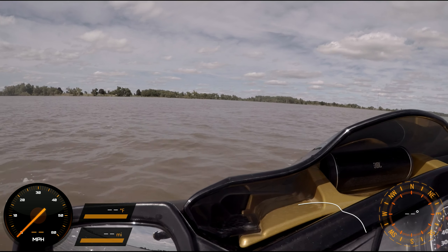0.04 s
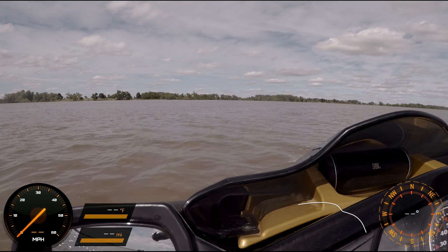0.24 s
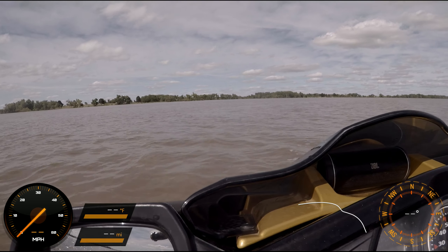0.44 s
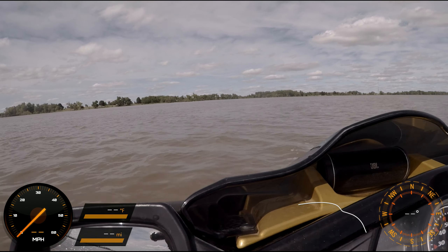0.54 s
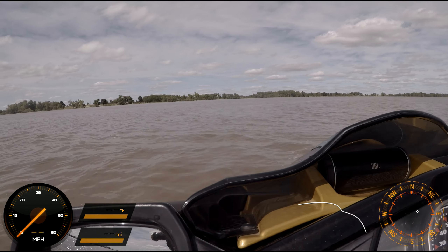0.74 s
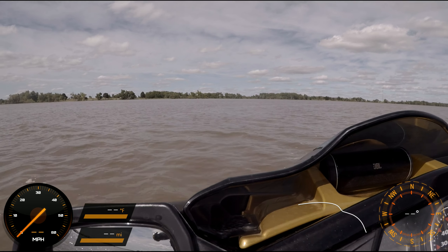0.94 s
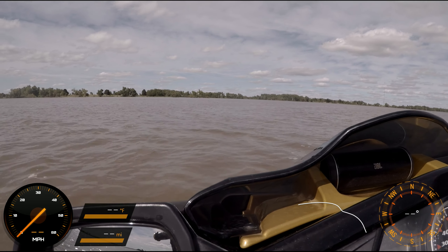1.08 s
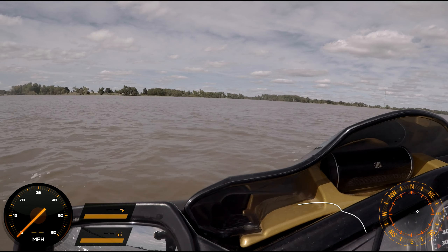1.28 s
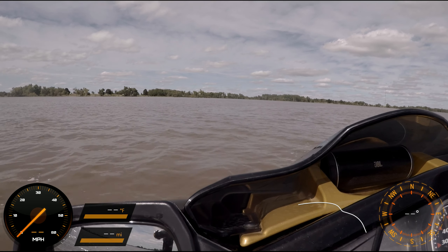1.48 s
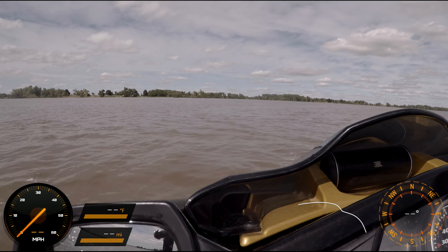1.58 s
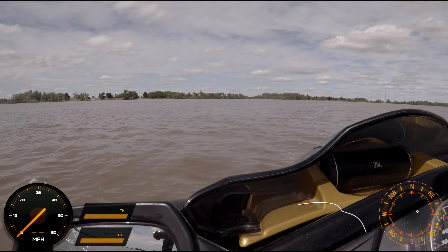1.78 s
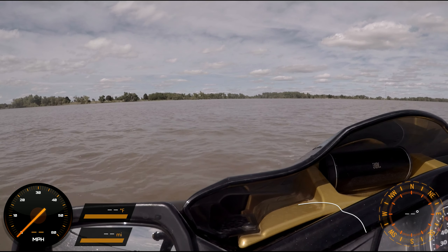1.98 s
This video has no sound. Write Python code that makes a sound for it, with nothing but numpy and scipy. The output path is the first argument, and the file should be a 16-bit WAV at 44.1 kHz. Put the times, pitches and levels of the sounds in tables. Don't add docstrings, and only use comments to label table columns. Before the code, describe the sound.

Waves knock on a small watercraft's hull: light thuds first, a hard burst near the middle, lesser knocks with faint scuffs and squeaks, then a final close cluster. Open water, muffled sealed microphone fixed to the hull.

```python
import sys
import numpy as np
from scipy import signal
from scipy.io import wavfile
from scipy.ndimage import uniform_filter1d

SR = 44100
rng = np.random.default_rng(int(sys.argv[2]) if len(sys.argv) > 2 else 0)


def gain_from_decibels(decibels):
    exponent = np.asarray(decibels, float) / 20
    return 10 ** exponent


def to_wav(sig):
    pcm = np.clip(np.atleast_2d(sig), -1, 1) * 32767
    pcm = np.round(pcm).astype(np.int16)
    wavfile.write(sys.argv[1], SR, pcm.T)


N = 89126

# (time [s], knock [dB], boom [dB], thud [dB], tick [dB])
WAVE_KNOCKS = [(.127, -47, -39, -40, -74), (.245, -33.5, -25, -25, -67), (.254, -33.5, -22.5, -27.5, -65),
               (.302, -52, -21, -31, -71), (0.381, -40.5, -28.5, -39, -74), (0.641, -47, -34.5, -48, -57.5),
               (.689, -46.5, -27, -37.5, -53), (.7, -47, -35.5, -40.5, -69), (.890, -18, -15.5, -13.5, -35),
               (.901, -28.5, -26, -15, -65), (0.914, -36, -22, -25, -65), (.960, -24, -14.5, -19.5, -44.5),
               (1.004, -23, -19.5, -18, -47.5), (1.016, -38, -24.5, -19, -71),
               (1.150, -40, -36, -35.5, -46.5), (1.269, -40, -32, -35.5, -69),
               (1.371, -36, -38, -37.5, -53), (1.379, -37, -24, -30.5, -55),
               (1.514, -29.5, -20.5, -26.5, -67), (1.578, -49, -36, -40, -70),
               (1.644, -30.5, -36, -28, -74), (1.654, -44, -40, -31.5, -76), (1.680, -35, -36, -28.5, -74),
               (1.690, -40, -35, -29.5, -74), (1.755, -40, -37, -43, -69), (1.841, -48, -42, -38, -69),
               (1.859, -32.5, -17.5, -29.5, -60), (1.911, -21, -32, -24.5, -45.5),
               (1.928, -32, -38, -20.5, -48), (1.944, -31, -41, -23.5, -61), (1.972, -53, -21, -31, -59),
               (1.995, -24.5, -27, -18, -48), (1.999, -18.5, -20.5, -14, -47), (2.013, -26, -22, -14, -64)]
# (frequency [Hz], level [dB], t60 [s])
HULL_MODES = [(79.6, 0, 0.3), (106.5, 1.5, 0.23), (154.4, -0.5, 0.12), (209.2, 5.5, 0.094),
              (245, -3, 0.098), (293.6, -6, 0.071), (338.3, -5, 0.14), (383.7, -11, 0.12),
              (441, -8.5, 0.054), (538, -4, 0.076), (622.5, -6, 0.062), (758, -6.5, 0.034),
              (877.4, -11.5, 0.036)]
# (frequency [Hz], level [dB], t60 [s])
HOUSING_MODES = [(978, -19.5, 0.087), (1160, -21.5, 0.038), (1245, -15.5, 0.06), (1438, 5, 0.034),
                 (1748, 11.5, 0.011), (2013, 7.5, 0.011), (2304, 6, 0.023), (2456, -9, 0.026),
                 (3400, -2, 0.021), (3970, -6.5, 0.013), (4870, -14, 0.006), (5660, -10.5, 0.012),
                 (7900, -14, 0.016)]
# (start [s], length [s], frequency [Hz], level [dB])
HULL_HEAVES = [(.3, 0.062, 31.8, -20), (.39, 0.056, 76.4, -22), (.62, 0.075, 75.3, -27.5),
               (.7, 0.044, 91, -24), (.882, 0.037, 76.5, -10.5), (.888, 0.025, 212, -12),
               (.925, 0.042, 40.7, -16), (.965, 0.063, 79.3, -5.5), (1.005, 0.047, 45, -14),
               (1.045, 0.029, 206, -21.5), (1.06, 0.049, 28, -15), (1.105, 0.066, 31.3, -12.5),
               (1.135, 0.037, 75, -14), (1.18, 0.048, 54, -15), (1.295, 0.026, 50.3, -20),
               (1.34, 0.062, 61.3, -21), (1.385, 0.099, 28.6, -14.5), (1.455, .04, 50.8, -17),
               (1.5, 0.063, 34.7, -18.5), (1.505, 0.043, 122.4, -14), (1.655, 0.039, 158.6, -19.5),
               (1.71, 0.059, 156, -27.5), (1.83, 0.03, 61.4, -17), (1.86, 0.029, 85, -23),
               (1.92, 0.054, 45.4, -25), (1.995, 0.017, 186, -6.5), (2.011, 0.015, 150, -13)]
# (time [s], wind [dB], hull drumming [dB])
BUFFETING = [(0.0, -30, -29.5), (0.17, -32.5, -28), (0.22, -59, -28.5), (0.33, -19.5, -24.5),
             (0.57, -38.5, -30), (0.6, -24.5, -29), (0.71, -30, -31.5), (0.89, -21, -27),
             (0.93, -22.5, -14), (1.07, -15.5, -21), (1.16, -19, -23.5), (1.29, -28, -32), (1.4, -20, -23),
             (1.56, -17.5, -30.5), (1.59, -31, -28), (1.91, -22.5, -26), (1.93, -25, -19.5),
             (2.02, -41, -10)]
# (frequency [Hz], density [dB per Hz])
WIND_SPECTRUM = [(14, -6.5), (22, -7.5), (32, 9), (45, 2.5), (60, -12.5), (85, -11), (120, -12.5),
                 (170, -26)]
# (start [s], length [s], level [dB], tilt [dB per octave], airy top [dB])
MOUNT_SCUFFS = [(0.357, 0.046, -56, -9, -12), (0.64, 0.015, -59, -6.5, -14),
                (0.683, 0.023, -49.5, -6.5, -11), (0.875, 0.032, -38.5, -5, -10.5),
                (0.942, 0.035, -43, -7, -16.5), (0.991, 0.036, -45.5, -6.5, -14),
                (1.107, 0.046, -61, -3, -11), (1.14, 0.023, -46.5, -2, -14), (1.255, 0.034, -51.5, -4, -14),
                (1.367, 0.044, -41.5, -5, -2), (1.499, 0.045, -43.5, -4.5, -1.5),
                (1.564, 0.039, -54, -6, -11), (1.642, 0.035, -53, -18, -7), (1.852, 0.056, -44, -6, -2),
                (1.907, 0.035, -41.5, -7.5, 3.5), (1.984, 0.036, -35.5, -11.5, -12)]
# (frequency [Hz], width [Hz], level [dB])
RUBBED_MODES = [(530, 48, -1.5), (753, 196, 3.5), (1128, 140, 8.5), (1282, 85, 1), (1580, 213, 7),
                (1890, 160, 3.5), (2400, 355, 5), (3610, 370, 2.5), (4650, 410, 2), (8500, 980, 7.5)]
# (start [s], length [s], frequency [Hz], level [dB])
MOUNT_SQUEAKS = [(0.057, 0.015, 1950, -51), (0.2415, 0.0072, 1246, -30.5), (.64, 0.013, 1150, -48),
                 (.655, .015, 1100, -51), (.885, 0.0094, 1725, -31), (1.005, 0.024, 551, -27),
                 (1.072, 0.015, 1585, -49), (1.114, .015, 3400, -62), (1.143, 0.013, 2510, -44),
                 (1.15, 0.027, 1045, -46), (1.262, 0.013, 2516, -53), (1.382, 0.031, 1220, -41.5),
                 (1.385, 0.035, 530, -32), (1.392, 0.023, 1774, -40.5), (1.445, 0.046, 906, -50),
                 (1.508, 0.027, 1118, -31.5), (1.542, 0.032, 3100, -54.5), (1.565, .04, 3010, -60),
                 (1.6, 0.04, 3000, -58), (1.635, 0.049, 3220, -62), (1.672, .04, 3150, -59.5),
                 (1.712, 0.045, 3050, -60), (1.751, 0.038, 869, -49.5), (1.844, 0.025, 2780, -52),
                 (1.908, 0.011, 630, -25.5)]
# (frequency [Hz], density [dB per Hz])
WASH_SPECTRUM = [(250, 7), (400, -4), (630, -13), (1000, -13.5), (2000, -19.5), (4500, -25.5), (10000, -29),
                 (16500, -48)]

SPREAD_DB = 2.5
LAG_S_AT_100_HZ = 0.00817
CONTACT_CYCLES, SHORTEST_CONTACT_S = 1.09, 0.0047
DRUM_PER_S, DRUM_DB, DRUM_TILT_DB = 160, -2, -9.5
EVEN_S = 0.07
SCUFF_GRAINS_PER_S = 5800
WASH_DB, WASH_PATCHY_DB, WASH_FOLLOWS = -49.5, 0.6, 0.73


def knocks():
    s, knock, boom, thud, tick = np.transpose(WAVE_KNOCKS)
    modes = HULL_MODES + HOUSING_MODES
    out = np.zeros(N + SR)
    chance = rng.standard_normal((len(s), len(modes), 2))
    for k, (hz, db, t60) in enumerate(modes):
        if hz < 130:
            base = boom
        elif hz < 450:
            base = thud
        elif hz < 1400:
            base = knock
        else:
            base = tick
        uneven = 1 + 0.262 * np.tanh(chance[:, k, 1])
        lag = LAG_S_AT_100_HZ * (100 / hz) ** 0.789 * uneven
        at = s + lag - 0.003
        strength = gain_from_decibels(base + db + SPREAD_DB * chance[:, k, 0]) * (-1) ** k
        clicks = np.zeros(N + SR)
        np.add.at(clicks, (at * SR).astype(int), strength)
        pressed = signal.fftconvolve(clicks, swell(hz))[:N + SR]
        out += ring(pressed, hz, t60)
    return out[:N]


def swell(hz):
    t = np.arange(int(max(CONTACT_CYCLES / hz, SHORTEST_CONTACT_S) * SR) + 2)
    push = np.hanning(len(t) + 2)[1:-1]
    return 2 * push * np.cos(2 * np.pi * hz * t / SR) / push.sum()


def ring(clicks, hz, t60):
    r, w = gain_from_decibels(-60 / (t60 * SR)), 2 * np.pi * hz / SR
    return signal.lfilter([0, np.sin(w)], [1, -2 * r * np.cos(w), r * r], clicks + 1e-18)


def heaves():
    return wavering_tones(HULL_HEAVES)


def wavering_tones(rows):
    t, waver, out = np.arange(N) / SR, drift(46.4), 0
    for s, length, hz, db in rows:
        shape = arch(t, s, length) ** 2
        out = out + gain_from_decibels(db) * shape * np.sin(2 * np.pi * hz * (t - s) + 0.5 * waver)
    return out


def arch(t, start, length):
    return np.sin(np.pi * np.clip((t - start) / length, 0, 1))


def drumming(level_db):
    out = 0
    for hz, db, t60 in HULL_MODES:
        taps = random_taps(DRUM_PER_S, 2.7, 4)
        soft = signal.fftconvolve(taps, swell(hz))[:N]
        level = gain_from_decibels(0.5 * db + DRUM_TILT_DB * np.log2(hz / 100))
        out = out + level * rms_one(ring(soft, hz, 0.6 * t60))
    return evened(out) * gain_from_decibels(level_db + DRUM_DB)


def random_taps(per_s, uneven_db, limit):
    happens = rng.random(N) < per_s / SR
    strength = gain_from_decibels(uneven_db * np.minimum(rng.exponential(1, N), limit))
    return happens * strength * rng.choice([-1, 1], N)


def wind(level_db):
    return gain_from_decibels(level_db - 2.5) * evened(banded_noise(WIND_SPECTRUM, 4.8, 0, knee_hz=100))


def evened(x):
    x = rms_one(x)
    return x / np.sqrt(uniform_filter1d(x ** 2, size=int(EVEN_S * SR)) + 0.15)


def scuffs():
    t, out = np.arange(N) / SR, 0
    grains = random_taps(SCUFF_GRAINS_PER_S, 0.73, 3)
    for hz, width_hz, db in RUBBED_MODES:
        stroke = 0
        for s, length, level_db, tilt_db, airy_db in MOUNT_SCUFFS:
            stroke_db = level_db + tilt_db * np.log2(hz / 1000) + airy_db * (hz > 6000)
            stroke = stroke + gain_from_decibels(stroke_db) * arch(t, s, length) ** 0.6
        r = np.exp(-1.5 * np.pi * width_hz / SR)
        resonance = [1, 0, -1, 1, -2 * r * np.cos(2 * np.pi * hz / SR), r * r]
        free, rubbed = signal.sosfilt([resonance] * 2, [grains, grains * stroke + 1e-18])
        out = out + gain_from_decibels(db - 8.5) * rubbed / np.std(free)
    return out


def squeaks():
    return wavering_tones(MOUNT_SQUEAKS)


def wash(drum_db):
    lift_db = WASH_FOLLOWS * (drum_db - np.median(drum_db))
    return gain_from_decibels(WASH_DB + 0.5) * banded_noise(WASH_SPECTRUM, WASH_PATCHY_DB, lift_db, knee_hz=1467)


def banded_noise(spectrum, patchy_db, lift_db, knee_hz):
    out, together, table = 0, drift(4.7), np.array(spectrum)
    white = rng.standard_normal((2, N + SR // 4))
    octaves = np.log2(min(table[-1, 0], 15000) / table[0, 0])
    edges = table[0, 0] * 2 ** np.arange(0, octaves, 0.5)
    for k, low in enumerate(edges):
        sos = signal.butter(2, [low, low * np.sqrt(2)], "band", fs=SR, output="sos")
        band = signal.sosfilt(sos, white[k % 2])[-N:]
        hz = low * 2 ** 0.25
        level_db = np.interp(np.log(hz), np.log(table[:, 0]), table[:, 1])
        flicker_db = patchy_db * (0.3 * together + drift(15))
        out = out + band * gain_from_decibels(level_db + flicker_db + lift_db / (1 + (hz / knee_hz) ** 2))
    return out / np.sqrt(np.median(uniform_filter1d(out ** 2, size=4000)))


def drift(rate):
    r = np.exp(-80 * np.pi * rate / SR)
    white = rng.standard_normal(N // 40 + 2002)
    slow = signal.lfilter([1], [1, -2 * r, r * r], white)[2000:]
    return np.interp(np.arange(N) / 40, np.arange(len(slow)), rms_one(slow))


def rms_one(x):
    return x / np.sqrt(np.mean(x ** 2) + 1e-20)


def in_time(rows):
    s, *columns = np.transpose(rows)
    return [np.interp(np.arange(N) / SR, s, c) for c in columns]


def scene():
    wind_db, drum_db = in_time(BUFFETING)
    hull = knocks() + heaves() + drumming(drum_db)
    mount = scuffs() + squeaks()
    return (hull + wind(wind_db) + mount + wash(drum_db))[None]


def top_cut(x):
    return signal.sosfilt(signal.butter(12, 15270, fs=SR, output="sos"), x)


def record(dry):
    mix = 1.246 * np.tanh(dry / 1.254)
    return top_cut(mix)


dry = scene()
out = record(dry)
to_wav(out)
```